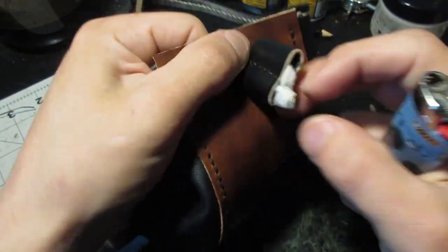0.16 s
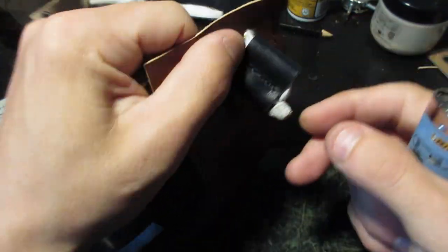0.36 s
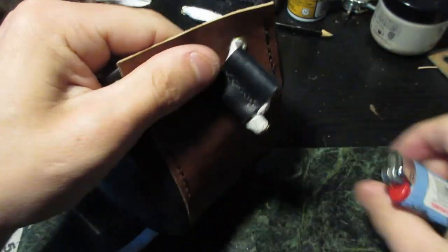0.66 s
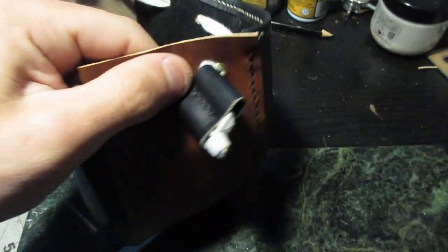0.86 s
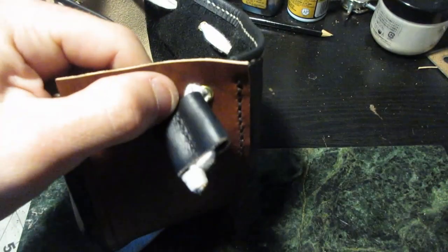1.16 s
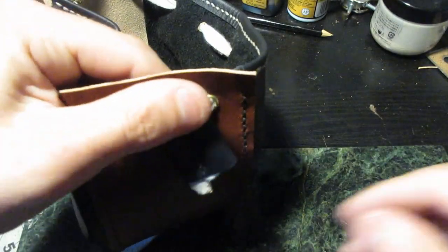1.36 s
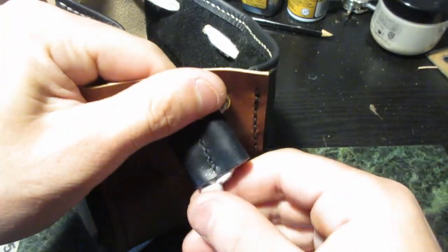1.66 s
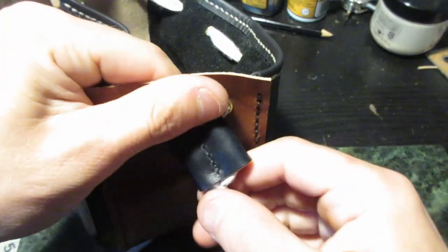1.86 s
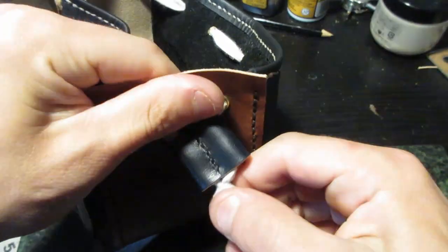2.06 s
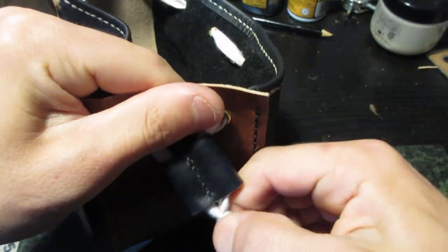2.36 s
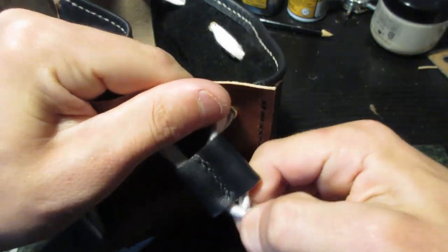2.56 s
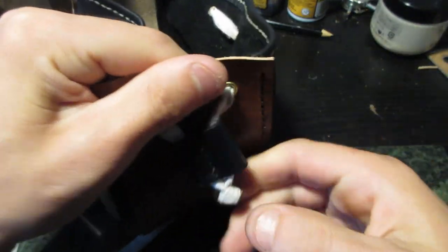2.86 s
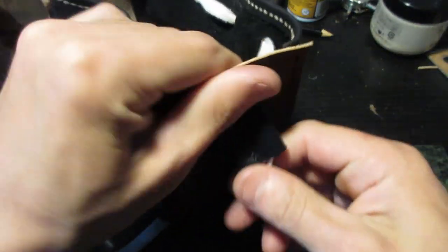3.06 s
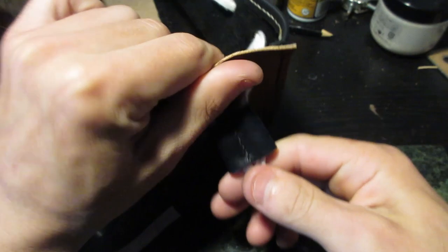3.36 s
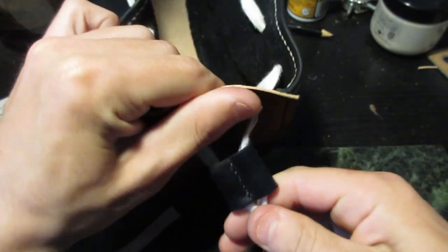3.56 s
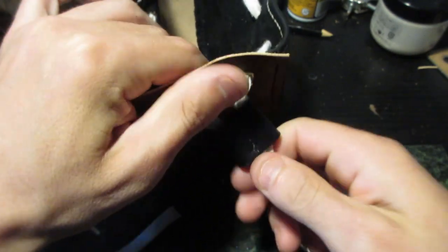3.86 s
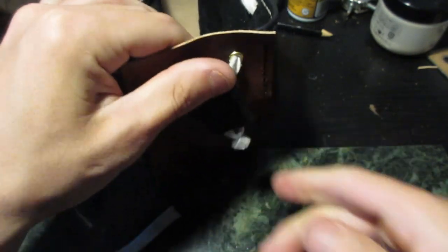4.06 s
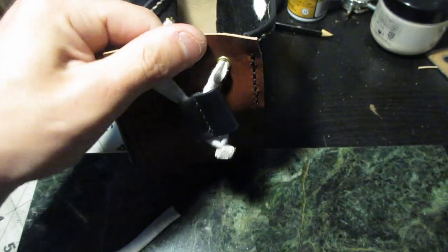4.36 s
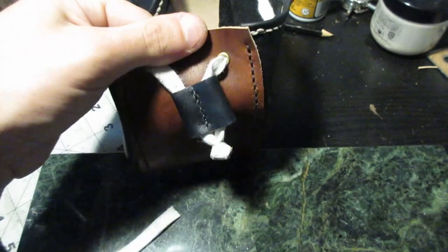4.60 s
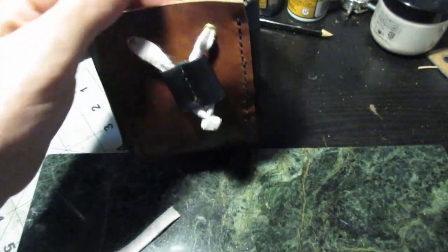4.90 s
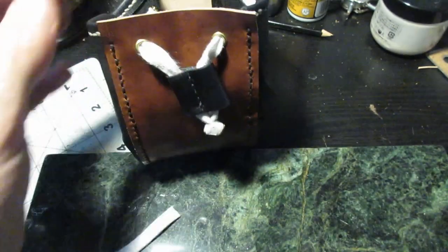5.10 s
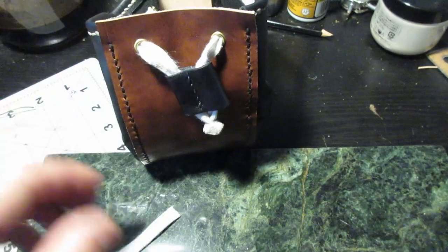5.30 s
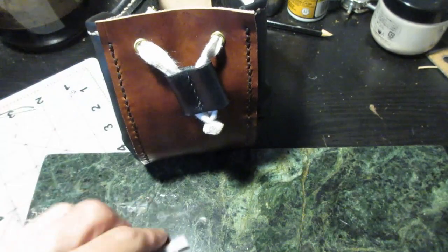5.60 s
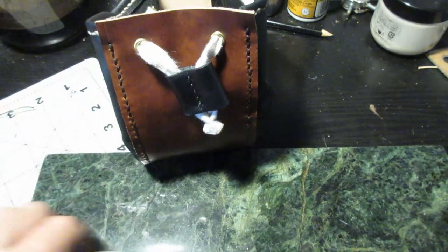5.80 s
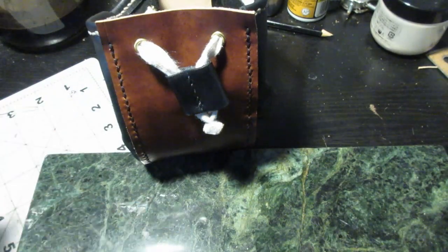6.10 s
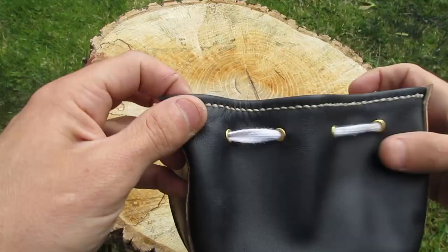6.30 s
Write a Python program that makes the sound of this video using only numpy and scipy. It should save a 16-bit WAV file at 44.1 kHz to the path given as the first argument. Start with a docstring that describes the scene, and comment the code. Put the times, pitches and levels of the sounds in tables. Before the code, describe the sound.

A close camera microphone in a small, fairly dry room, with faint steady hiss throughout. From 0 s fingers rub a stiff leather pouch in short, gritty, slightly hollow strokes, with cord hissing lightly over it. Two quick coarse scrapes come at 0.35-0.45 s and a dry knock at 0.87 s. At 1.06 s a plastic lighter touches the table with a bright metallic clink, then bangs down very loudly at about 1.22 s, bouncing in a tight clatter and skidding until 1.4 s. The level ducks and creeps back. Small knocks at 1.4-1.5 s and a firm rub near 1.57 s follow, then softer rubbing, a thin squeak at 2.8 s, clustered hollow taps and a knock around 3.2 s, and knocks at 3.8 and 4.1 s, with another tiny squeak at 3.97 s. Light sliding fades after 5 s. A small hard click comes at 6.13 s; a low, lumpy bump and scuff at 6.34-6.45 s.

```python
"""Hands rub a stiff leather pouch from the start, exciting its hollow resonances by stick-slip friction.
Soft taps, the hiss of a sliding cord, two slider scrapes and knocks on the table join in.
After one second a plastic lighter with a steel hood drops, topples and bounces: blows ring shell, table
and hood, it skids, and the camera's gain ducks and creeps back. Handling goes on, with two thin cord squeaks.
At the end a hard click sounds and a hand bumps the camera; a small room and steady hiss lie under it all."""
import sys
import numpy as np
from scipy import signal
from scipy.fft import rfft, irfft, next_fast_len
from scipy.io import wavfile
from scipy.ndimage import uniform_filter1d, map_coordinates

SR = 44100
rng = np.random.default_rng(int(sys.argv[2]) if len(sys.argv) > 2 else 0)


def transcribe(u):
    """Save the signal u as a 16-bit wav file named by the first command-line argument.

    u: samples, shape (n,) or (channels, n), limited to [-1, 1]; the rate is SR.
    q: integer samples, one column per channel.
    """
    v = np.clip(np.atleast_2d(u).T, -1, 1)
    q = np.round(v * 32767).astype(np.int16)
    wavfile.write(sys.argv[1], SR, q)


N = 284243

# The other hand keeps hold of the pouch. The one row: start in seconds, length in seconds, level in dB.
HOLDING = (0, 5.16, -64.5)
# Fingers rubbing the pouch. Each row: start in seconds, length in seconds, level in dB, grip from 0 to 1
# (a firm grip sounds the hollow, a light one the gritty surface).
RUBS = [(.15, 0.19, -48.5, 0.53), (.29, 0.27, -45.5, 0.25), (.5, 0.3, -50.5, 0.35),
        (.71, 0.39, -44.5, 0.47), (1.565, 0.11, -39, 0.97), (1.86, 0.078, -55, 0.19),
        (1.93, 0.17, -51, 0.36), (2.16, 0.079, -48.5, 0.23), (2.53, .08, -48, 0.62),
        (2.58, 0.22, -43, 0.36), (2.795, 0.077, -53.5, .3), (2.975, 0.094, -45.5, 0.55),
        (3.055, .11, -49, 0.5), (3.17, 0.16, -57, 0.41), (3.275, 0.098, -41, 0.94), (3.46, .25, -53, 0.36),
        (3.615, .05, -45, 0.89), (3.66, 0.12, -46, 0.8), (3.8, .13, -54, 0.23), (4.11, .13, -51, .5),
        (4.268, 0.053, -47, 0.41), (4.3, 0.55, -58, 0.46), (4.77, 0.13, -51.5, 0.17)]
RUB_ATTACK, RUB_RELEASE = 0.28, 0.48  # shares of a rub's length
RUB_HISS_DB, GRIP_MUTES_DB = -4.5, 15.5  # hiss of a light rub against its body; a full grip takes this much off
# Resonances of the hollow pouch. Each row: centre in Hz, width in Hz, relative level in dB.
POUCH = [(236, 82, -9.5), (645.6, 94, 6), (850, 130, -6), (1028, 120, -13.5), (1408, 64, 0), (1835, 74, -7),
         (2137, 250, -11.5), (2915, 240, -12), (4400, 1700, -24)]
# Spectrum of skin and grit on leather. Each row: frequency in Hz, relative level in dB.
SKIN_SPECTRUM = [(80, -18), (220, -2.5), (480, -8), (700, -5), (1200, -2.5), (2000, -0.5), (3500, -6),
                 (5000, -14), (10000, -28), (16000, -44)]
# Taps and ticks of nails, knot and slider on the pouch; the last is a tick as the hand bumps the camera.
# Each row: start in seconds, level in dB, centre in Hz.
TAPS = [(.18, -45.5, 7000), (.968, -44, 900), (1.016, -46, 11000), (1.5824, -36, 890), (1.652, -41, 739),
        (2.182, -46.5, 2200), (2.667, -45, 3480), (3.055, -42.5, 990), (3.189, -44, 1470),
        (3.201, -47.5, 3940), (3.232, -35, 1190), (3.27, -36.5, 1300), (3.892, -46.5, 3860),
        (3.9135, -44, 1390), (5.924, -51, 900), (6.401, -43.5, 3460)]
# Cord and skin sliding lightly over the leather. Each row: start in seconds, length in seconds, level in dB.
SLIDES = [(0.273, 0.91, -55.5), (0.382, 0.12, -47.5), (0.588, 0.072, -61), (0.755, 0.17, -53.5),
          (0.826, 0.051, -46.5), (2.643, 0.087, -56), (3.356, 0.66, -65), (4.064, .17, -51),
          (4.162, .29, -50), (4.477, .11, -52), (5.07, .3, -60), (5.46, .62, -64.5)]
SLIDE_ATTACK, SLIDE_RELEASE = .2, .2  # shares of a slide's length
# Spectrum of the fine sliding hiss. Each row: frequency in Hz, relative level in dB.
SLIDE_SPECTRUM = [(300, -28), (1500, -4), (4000, -1.5), (9000, -4), (10500, -10), (15000, -20)]
# The leather slider scraping under the thumb. Each row: start in seconds, length in seconds, level in dB.
SCRAPES = [(0.349, 0.066, -37), (.41, 0.046, -27.5)]
# Resonances of the slider. Each row: centre in Hz, width in Hz, relative level in dB.
SLIDER = [(300, 120, -16), (664, 89, -2), (818, 103, 0), (1400, 126, -5), (2040, 210, -5.5),
          (2520, 300, -9.5)]
# The pouch's stiff edge knocking on the table. Each row: start in seconds, level in dB, centre in Hz,
# thud level in dB.
KNOCKS = [(0.8665, -31, 870, -45), (1.407, -40.5, 1100, -43), (1.478, -39.5, 830, -39.5),
          (3.2494, -30, 900, -42), (3.7996, -32.5, 880, -47), (4.1016, -35, 1410, -37)]
# Higher modes of the table that a knock sounds. Each row: frequency in Hz, relative level in dB, 60 dB decay in
# seconds.
KNOCK_TABLE_MODES = [(250, -6.5, 0.05), (360, -1, 0.047), (434, -6.5, 0.021)]
# The lighter skidding on the table. Each row: start in seconds, length in seconds, level in dB,
# share that sounds its shell from 0 to 1.
SKIDS = [(1.031, 0.11, -32.5, 0.06), (1.135, 0.1, -47.5, 0.15), (1.23, .16, -32.5, 0.9)]
SKID_ATTACK, SKID_RELEASE = 0.18, 0.75  # shares of a skid's length
# Contacts of the lighter with the table. Each row: start in seconds, level in dB, centre in Hz,
# table thump level in dB, hood ring level in dB.
DROP = [(1.063, -22.5, 2920, -32.5, -19), (1.069, -27, 3430, -28, -24), (1.077, -28.5, 9160, -39.5, -33.5),
        (1.2147, -11, 4330, -16.5, -36), (1.2252, -7.5, 1110, -23, -47), (1.2321, -29.5, 2014, -29, -43),
        (1.259, -18, 3500, -31.5, -32), (1.2809, -23, 3040, -24.5, -30), (1.292, -31, 2210, -28, -42),
        (1.321, -28, 900, -26, -60)]
# The lighter's shell on the table top. Each row: centre in Hz, width in Hz, relative level in dB.
SHELL = [(624.4, 62, 6), (870, 170, 1.5), (1064, 110, 1), (1380, 170, 0.5), (1700, 270, 1.5),
         (2100, 120, 1.5), (2556, 240, -4.5), (3950, 290, -4.5), (4640, 330, -8.5), (5850, 1000, -4.5),
         (8100, 510, -11)]
# Modes of the table. Each row: frequency in Hz, relative level in dB, 60 dB decay in seconds.
TABLE_MODES = [(166, -8.5, 0.087), (228, 0, 0.1), (262, -3, 0.08), (308, 0.5, 0.047), (381, -10, .05)]
# Ringing modes of the lighter: the first four rows are modes of its shell, the rest of the steel hood. Each
# row: frequency in Hz, relative level in dB, 60 dB decay in seconds when free.
RING_MODES = [(2069, -2, .04), (3840, -7, .035), (4246, 0, .03), (4590, 0, .05), (8387, -3, .15),
              (11300, -6, .065), (13916, -18, .12)]
FLAT_S, FLAT_RING = 1.2, .35  # when the lighter falls flat (s), and the share of the hood's ring time then left
# The cord squeaking in the slider. Each row: start in seconds, length in seconds, level in dB, pitch in Hz.
SQUEAKS = [(2.81, .05, -56.5, 5500), (3.97, .045, -56.5, 4260)]
SQUEAK_WIDTH_HZ = 400
CLICK_S, CLICK_DB = 6.132, -41.5  # a small, hard click near the camera
# Resonances of what clicks. Each row: centre in Hz, width in Hz, relative level in dB.
CLICKER = [(620, 180, 1), (3200, 500, -0.5), (4200, 450, -9), (6500, 1300, -2.5)]
# A hand on the camera. Each row: time in seconds, rumble level in dB, scuff level in dB.
BUMP = [(6.332, -71.5, -74), (6.338, -39, -39.5), (6.36, -30, -41.5), (6.383, -41, -42), (6.396, -26, -39),
        (6.435, -32, -43), (6.446, -36, -36)]
# Resonances of the camera body. Each row: centre in Hz, width in Hz, relative level in dB.
CASE = [(42, 50, -3), (106, 28, 1), (163, 40, -0.5), (207, 63, -7.5)]
# Spectrum of the hand's scuff. Each row: frequency in Hz, relative level in dB.
SCUFF_SPECTRUM = [(60, -8.5), (280, 3.5), (500, -2.5), (800, -3.5), (2000, -8.5), (3500, -14),
                  (9000, -28.5), (15000, -40)]
# Spectrum of the steady hiss. Each row: frequency in Hz, relative level in dB.
HISS_SPECTRUM = [(20, -11.5), (60, -6.5), (130, -3.5), (300, -10), (550, -12), (750, -13), (950, -11),
                 (1200, -16.5), (1550, -13.5), (2200, -20.5), (5000, -23.5), (9000, -27.5), (15000, -36)]
# Reverberation of the room. Each row: frequency in Hz, 60 dB decay in seconds.
ROOM_DECAY = [(150, 0.64), (600, 0.33), (1500, 0.22), (5000, 0.29), (12000, .17)]
TOP_HZ = 15100  # the camera's upper band limit


def amp(db):
    """Logarithmic level: decibels to gain."""
    return 10 ** (np.asarray(db) / 20)


def unit(x):
    """Normalisation: x at rms 1."""
    return x / np.sqrt(np.mean(x ** 2) + 1e-20)


def along(points, hz):
    """Interpolation of (Hz, value) points on a logarithmic frequency axis."""
    f, v = np.transpose(points)
    return np.interp(np.log(hz + 1), np.log(f + 1), v)


def curves(rows):
    """Linear interpolation in time: one value per sample for each column after the time."""
    s, *cols = np.transpose(rows)
    return [np.interp(np.arange(N) / SR, s, c) for c in cols]


def wobble(rate):
    """Slow random modulation: a smooth curve through random knots, rate of them a second."""
    knots = rng.standard_normal(int(N * rate / SR) + 4)
    return map_coordinates(knots, [np.arange(N) * rate / SR])


def filtered(x, response):
    """Linear filtering: x times a complex response of frequency."""
    m = next_fast_len(len(x) + SR // 8)
    return irfft(rfft(x, m) * response(np.fft.rfftfreq(m, 1 / SR)), m)[:len(x)]


def coloured(x, spectrum):
    """Spectral shaping: x weighted by the given spectrum, at rms 1."""
    return unit(filtered(x, lambda hz: amp(along(spectrum, hz))))


def body(modes, hz):
    """Modal superposition: causal response of parallel resonances with alternating sign."""
    total = 0
    for k, (centre, width, db) in enumerate(modes):
        damping = 1j * hz * width
        total = total + (-1) ** k * amp(db) * damping / (centre * centre - hz * hz + damping)
    return total


def add(track, s, sound):
    """Superposition: mix a sound into the track at time s."""
    part = track[round(s * SR):][:len(sound)]
    part += sound[:len(part)]


def slips(rate, spread_db, smooth):
    """Stick-slip friction: tiny slips of uneven size over a smooth drag."""
    happens = rng.random(N) < rate / SR
    size = amp(spread_db * np.clip(rng.standard_normal(N), -2, 2))
    grains = happens * rng.choice([-1, 1], N) * size
    return unit(unit(grains) + smooth * rng.standard_normal(N))


def stroke(start, length, attack, release):
    """Motion envelope: gain rises, holds and falls to rest; attack and release are shares of the length."""
    u = (np.arange(N) / SR - start) / length
    return np.clip(np.minimum(u / attack, (1 - u) / release), 0, 1)


def patchy(x, depth_db):
    """Time-varying spectrum: the colour of a sliding contact shifts from moment to moment."""
    z = signal.stft(x, nperseg=512)[2]
    field = uniform_filter1d(rng.standard_normal(z.shape), size=7, axis=0)
    field = uniform_filter1d(field, size=5, axis=1)
    return unit(signal.istft(z * amp(depth_db * unit(field)), nperseg=512)[1][:N])


def sliding_hiss():
    """Fine-grained friction: dense, fine slips whose colour keeps shifting."""
    fine = slips(rate=2500, spread_db=5.5, smooth=1.2)
    return patchy(coloured(fine, SLIDE_SPECTRUM), depth_db=3.0)


def friction(rows, response, attack, release, hiss_db, mute_db):
    """Friction-driven resonance: the firmer the contact, the more body and the less grit and hiss."""
    drag = slips(rate=350, spread_db=4.0, smooth=0.4) * amp(3.8 * wobble(70))
    hollow = unit(filtered(drag, response))
    surface = coloured(slips(rate=450, spread_db=2.0, smooth=0.7), SKIN_SPECTRUM)
    hiss = sliding_hiss()
    track = np.zeros(N)
    for start, length, db, grip in rows:
        grip = np.clip(grip, 0, 1)
        sound = np.sqrt(grip) * hollow + np.sqrt(1 - grip) * surface  # the two shares of power sum to 1
        sound = sound + amp(hiss_db - mute_db * grip) * hiss
        track += amp(db) * stroke(start, length, attack, release) * sound
    return track


def blow(x):
    """Normalisation of an impact: x at rms 1 over its first 8 ms."""
    return x / np.sqrt(np.mean(x[:round(.008 * SR)] ** 2))


def hardness(centre_hz, hz, focus):
    """Contact stiffness: the band that a contact excites; soft contacts hold little treble."""
    return body([(centre_hz, centre_hz / focus, 0)], hz) / (1 + 1j * hz / (3 * centre_hz))


def contact(centre_hz, modes, direct_db, t60, focus):
    """Impact excitation: a brief crunch drives a body; the harder the contact, the higher its centre."""
    t = np.arange(SR // 8) / SR
    crunch = rng.standard_normal(len(t)) * amp(-60 * t / t60)

    def response(hz):
        return hardness(centre_hz, hz, focus) * (body(modes, hz) + amp(direct_db))
    return blow(filtered(crunch, response))


def ring(modes, attack):
    """Free vibration: exponentially decaying modes, struck at slightly new strengths."""
    t = np.arange(SR // 2) / SR
    tones = 0
    for hz, db, t60 in modes:
        decay = amp(db + rng.normal(0, 1) - 60 * t / t60)
        tones = tones + decay * np.sin(2 * np.pi * hz * t)
    return blow(tones * (1 - np.exp(-t / attack)))


def rubbing():
    """Forced resonance: dragging fingers sound the pouch, over the faint rustle of the holding hand."""
    start, length, db = HOLDING
    rustle = coloured(slips(rate=300, spread_db=4.0, smooth=0.66), SKIN_SPECTRUM)
    unrest = amp(db + 1.6 * wobble(9))  # the hand never lies quite still
    holding = unrest * stroke(start, length, attack=0.033, release=.04) * rustle
    rubs = friction(RUBS, lambda hz: body(POUCH, hz), RUB_ATTACK, RUB_RELEASE,
                    hiss_db=RUB_HISS_DB, mute_db=GRIP_MUTES_DB)
    return holding + rubs


def taps():
    """Impact on resonances: soft taps sound hollow, nails only tick; all share the pouch's resonances."""
    track = np.zeros(N)
    for s, db, centre_hz in TAPS:
        # the harder the contact, the more of it is heard directly
        direct_db = -15 + 7 * np.log2(centre_hz / 1000)
        add(track, s, amp(db) * contact(centre_hz, POUCH, direct_db=direct_db, t60=0.021, focus=1.4))
    return track


def sliding():
    """Light sliding friction: cord and skin hiss as they run over the leather."""
    push = sum(amp(db) * stroke(s, length, SLIDE_ATTACK, SLIDE_RELEASE) for s, length, db in SLIDES)
    return sliding_hiss() * push


def scrape():
    """Coarse stick-slip: the slider sticks and slips in short bursts."""
    drag = slips(rate=550, spread_db=3, smooth=0.59)
    push = sum(amp(db) * stroke(s, length, attack=0.41, release=0.51) for s, length, db in SCRAPES)
    return push * unit(filtered(drag, lambda hz: body(SLIDER, hz) / (1 + 1j * hz / 7000)))


def knocks():
    """Impact and table modes: the pouch meets the table with a dry knock, and the table gives a short thud."""
    track = np.zeros(N)
    for s, db, centre_hz, thud_db in KNOCKS:
        add(track, s, amp(db) * contact(centre_hz, POUCH, direct_db=-4.0, t60=0.018, focus=0.76))
        add(track, s, amp(thud_db) * ring(KNOCK_TABLE_MODES, attack=0.00051))
    return track


def skidding():
    """Gentle friction: the lighter grates over the table, too softly to wake its high modes, and rests."""
    def dull_shell(hz):
        return body(SHELL, hz) * hardness(800, hz, focus=.6)
    return friction(SKIDS, dull_shell, SKID_ATTACK, SKID_RELEASE, hiss_db=-6, mute_db=23.5)


def thump():
    """Radiation efficiency: the table's low answer to a blow; its top radiates little deep bass."""
    no_bass = signal.butter(4, 165, "highpass", fs=SR, output="sos")
    return blow(signal.sosfilt(no_bass, ring(TABLE_MODES, attack=0.00036)))


def lighter():
    """Selective modal excitation: blows clack the shell, thump the table and ring shell and hood modes near
    their band."""
    track = np.zeros(N)
    for s, db, centre_hz, thump_db, ring_db in DROP:
        add(track, s, amp(db) * contact(centre_hz, SHELL, direct_db=-17.5, t60=.018, focus=0.71))
        add(track, s, amp(thump_db) * thump())
        free = FLAT_RING if s > FLAT_S else 1  # once the lighter lies flat, the table damps its ringing
        struck = []
        for hz, level, t60 in RING_MODES:
            band_db = 20 * np.log10(abs(hardness(centre_hz, hz, focus=2.4)))
            struck.append((hz, level + band_db, free * t60))
        add(track, s, amp(ring_db) * ring(struck, attack=0.00025))
    return track


def squeaks():
    """Narrow resonance: friction noise in one slim band makes the taut cord's thin squeak."""
    drag = rng.standard_normal(N)
    track = np.zeros(N)
    for s, length, db, pitch_hz in SQUEAKS:
        tone = unit(filtered(drag, lambda hz: body([(pitch_hz, SQUEAK_WIDTH_HZ, 0)], hz)))
        track += amp(db) * stroke(s, length, attack=.4, release=0.37) * tone
    return track


def click():
    """Hard impact: one dry click of hard plastic."""
    track = np.zeros(N)
    add(track, CLICK_S, amp(CLICK_DB) * contact(3600, CLICKER, direct_db=-17.5, t60=0.027, focus=0.22))
    return track


def bump():
    """Structure-borne sound: a hand sends lumps of rumble through the camera's case, and a scuff."""
    rumble_db, scuff_db = curves(BUMP)  # the first row's faint levels hold until its time
    rumble = unit(filtered(rng.standard_normal(N), lambda hz: body(CASE, hz)))
    scuff = coloured(slips(rate=1300, spread_db=3.5, smooth=.7), SCUFF_SPECTRUM)
    return amp(rumble_db) * rumble + amp(scuff_db) * scuff


def room(x):
    """Reverberation: a small room where each frequency dies at its own speed."""
    hz, t, z = signal.stft(rng.standard_normal(SR // 2), SR, nperseg=256)
    decay = amp(-60 * t / along(ROOM_DECAY, hz)[:, None])
    tail = signal.istft(z * decay, SR, nperseg=256)[1]
    tail = np.concatenate([np.zeros(round(.004 * SR)), tail])  # the tail starts 4 ms late
    return signal.fftconvolve(x, tail / np.linalg.norm(tail))[:N]


def scene():
    """Superposition: handling and the dropped lighter in the room, the camera bump and a steady hiss."""
    handling = rubbing() + taps() + sliding() + scrape() + knocks() + squeaks()
    near = handling + skidding() + lighter() + click()
    hiss = amp(-55.0) * coloured(rng.standard_normal(N), HISS_SPECTRUM)
    return (near + amp(-12) * room(near) + bump() + hiss)[None]


def gain_control(x, depth_db, attack, release):
    """Automatic gain control: an overloading blow pulls the gain down; it creeps back (times in s)."""
    t = np.arange(N) / SR
    power = np.abs(uniform_filter1d(x ** 2, size=SR // 50))  # mean over 20 ms
    level_db = 10 * np.log10(power + 1e-12)
    overload = np.clip((level_db + 16.5) / 2, 0, 1)
    # peak hold with exponential release
    held = np.maximum.accumulate(overload * np.exp(t / release)) * np.exp(-t / release)
    step = 1 / (attack * SR)
    return x * amp(-depth_db * signal.lfilter([step], [1, step - 1], held))


def record(dry):
    """Limited dynamics and bandwidth: gain control, soft clipping and the camera's steep low-pass."""
    x = gain_control(dry[0], depth_db=15, attack=0.055, release=0.89)
    x = x / (1 + (x / .75) ** 4) ** (1 / 4)  # saturates towards 0.75
    return filtered(x, lambda hz: 1 / (1 + (hz / TOP_HZ) ** 80))[None]


dry = scene()
out = record(dry)
transcribe(out)
```